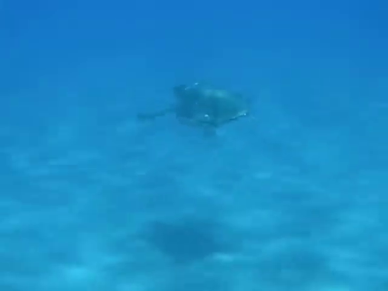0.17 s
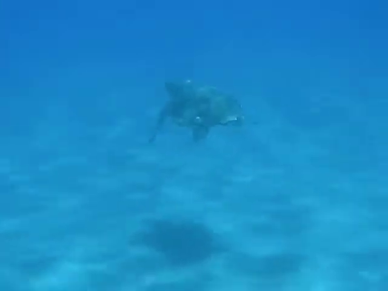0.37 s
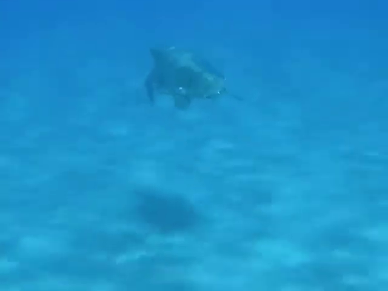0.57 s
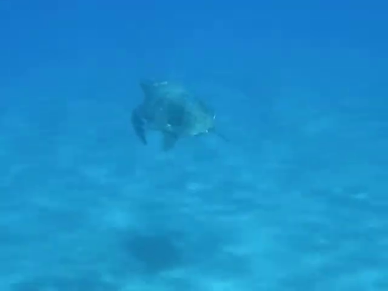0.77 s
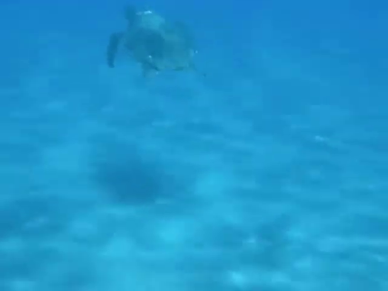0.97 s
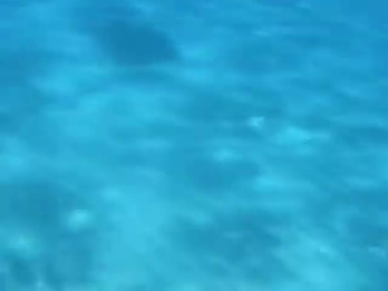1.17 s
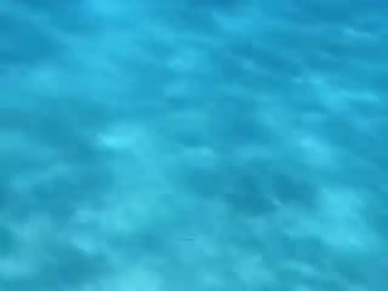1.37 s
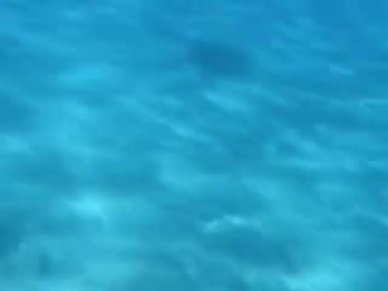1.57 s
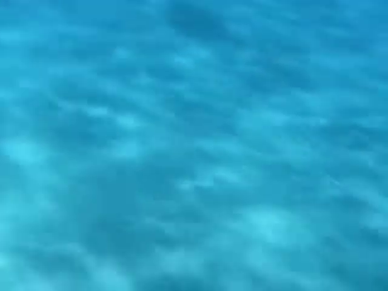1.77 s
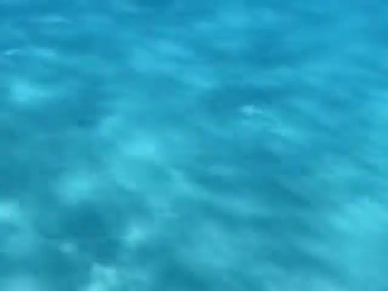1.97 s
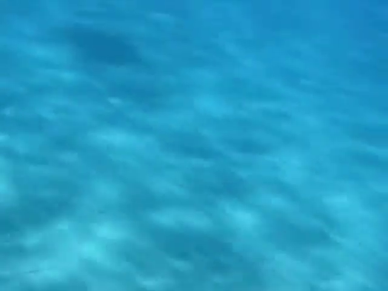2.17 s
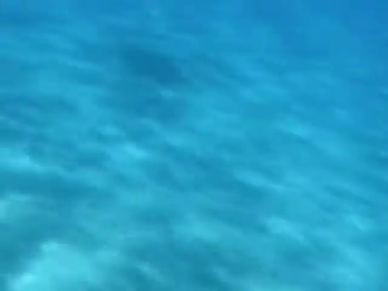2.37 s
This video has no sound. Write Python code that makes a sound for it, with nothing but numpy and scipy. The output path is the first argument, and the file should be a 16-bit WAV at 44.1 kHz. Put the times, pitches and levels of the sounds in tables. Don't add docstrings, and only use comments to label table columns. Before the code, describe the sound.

Water rushes and churns around a sealed camera in the sea, low, boxy and muffled, with the microphone inside the housing. Gulps cluster at 0.2-0.35 s, then small ticks and glugs around 0.65-0.9 s. After a calmer moment, bubbling returns near 1.3 s; hard, distorted gulps and a ringing knock hit at 1.6-1.75 s. Softer glugs follow before another loud surge around 2.2 s, then it eases.

```python
import sys
import numpy as np
from scipy import signal
from scipy.fft import rfft, irfft
from scipy.io import wavfile
from scipy.ndimage import uniform_filter1d

SR = 44100
rng = np.random.default_rng(int(sys.argv[2]) if len(sys.argv) > 2 else 0)


def wav_out(sig):
    wavfile.write(sys.argv[1], SR, np.round(np.clip(np.atleast_2d(sig).T, -1, 1) * 32767).astype(np.int16))


def field_ratio(decibels):
    return 10 ** (np.asarray(decibels, dtype=float) / 20)


N = 106589


def evened(x):
    return x / np.sqrt(np.mean(x ** 2) + 1e-20)


def read_spectrum(points, hz):
    f, level = np.transpose(points)
    return np.interp(np.log(hz + 1), np.log(f + 1), level)


def blip(length, hz, peak_at, glide, sharp):
    u = np.arange(0, 2 * length, 1 / SR) / length
    swell = (u / peak_at * np.exp(1 - u / peak_at)) ** sharp
    fade = np.cos(np.pi * u / 4) ** 2
    pitch = hz * (1 + glide * (u - peak_at))
    return swell * fade * np.sin(2 * np.pi * np.cumsum(pitch) / SR)


def add(mix, start, sound):
    part = mix[round(start * SR):][:len(sound)]
    part += sound[:len(part)]


def blips(rows, peak_at, glide, sharp):
    out = np.zeros(N)
    for start, length, hz, db in rows:
        add(out, start, field_ratio(db) * blip(length, hz, peak_at, glide, sharp))
    return out


# [t/s, flow pressure level/dB, bubble churn level/dB, camera sway level/dB]
FLOW = [(0, -26, -45, -34.5), (.17, -28.5, -38, -37), (.24, -22, -34.5, -27.5), (.3, -23, -42, -29.5),
        (.345, -23.5, -26, -35), (.39, -24.5, -44, -35.5), (.62, -24, -35.5, -36.5), (.78, -26.5, -26, -29),
        (0.849, -24.5, -26, -27.5), (.97, -22.5, -37, -34.5), (1.21, -23.5, -35, -31),
        (1.37, -22, -22, -28), (1.54, -21, -32, -26), (1.631, -13.5, -23.5, -20), (1.78, -16.5, -33.5, -21),
        (2.061, -21, -30.5, -34), (2.24, -11, -25, -34), (2.41, -21, -29.5, -32)]


def flow_db(t, column):
    rows = np.array(FLOW)
    return np.interp(t, rows[:, 0], rows[:, column] - np.median(rows[:, column]))


# [f/Hz, width/Hz, level/dB]
HOUSING_MODES = [(226, 55.3, 3.5), (300, 76, 1.5), (394.2, 72, -3), (519.5, 120, -13), (1210, 280, -14),
                 (1315, 66, -17.5), (1764, 420, -19.5), (1915, 160, -19.5), (2414, 140, -23),
                 (2725, 900, -29.5), (3091, 120, -24.5), (3602, 244, -27.5), (4170, 180, -49)]
# [f/Hz, level/dB]
BROAD_SHAKING = [(20, -4.5), (60, -8), (130, -7), (700, -29), (1500, -31.5), (2200, -46), (3300, -32.5),
                 (4400, -67)]


def housing_gain(hz):
    power = field_ratio(read_spectrum(BROAD_SHAKING, hz)) ** 2
    for f, width, db in HOUSING_MODES:
        power += field_ratio(db) ** 2 / (1 + (2 * (hz - f) / width) ** 2) ** 2
    return np.sqrt(power)


def rush():
    hop, size = 256, 1024
    frames, hz = N // hop + 5, np.fft.rfftfreq(size, 1 / SR)
    t = np.arange(frames) * hop / SR
    real, imag, patches = rng.standard_normal((frames, 513, 3)).T
    patches = uniform_filter1d(patches, size=8, axis=0)
    patches = evened(uniform_filter1d(patches, size=7, axis=1))
    flicker = evened(uniform_filter1d(rng.standard_normal(frames), size=3))

    split_hz, rumble_hz = 1500, 163
    hiss = (1 / (1 + (split_hz / (hz + 1)) ** 4))[:, None]
    rumble = (1 / (1 + (hz / rumble_hz) ** 6))[:, None]
    pressure, bubbling, sway = [flow_db(t, column) for column in (1, 2, 3)]
    level_db = (1 - hiss - rumble) * pressure
    level_db += rumble * 1.2 * sway
    level_db += hiss * (0.18 * bubbling - 0.096 * pressure)
    level_db += (1 - rumble) * (1 * patches - 1.9 * flicker)

    spectrum = (real + 1j * imag) * field_ratio(level_db)
    push = signal.istft(spectrum, nperseg=size, noverlap=size - hop)[1][:N]
    gain = housing_gain(np.fft.rfftfreq(N, 1 / SR))
    return field_ratio(-15.5) * evened(irfft(rfft(push) * gain, N))


# [f/Hz, level/dB]
BUBBLES = [(260, -10), (400, -1.5), (700, -1.5), (1100, -5.5), (1500, -10), (2000, -14)]


def churn():
    per_s, spread_db, cycles = 1600, 2, 6.74
    strength = field_ratio(spread_db * np.minimum(rng.exponential(1, N), 5))
    strength = strength * (rng.random(N) < per_s / SR)
    kind, out = rng.integers(0, 24, N), np.zeros(N)
    for k, hz in enumerate(np.geomspace(BUBBLES[0][0], BUBBLES[-1][0], num=24)):
        level = field_ratio(read_spectrum(BUBBLES, hz)) * np.sqrt(hz)
        grain = level * blip(cycles / hz, hz, peak_at=0.32, glide=0.088, sharp=1.7)
        out += signal.oaconvolve(strength * (kind == k), grain)[:N]
    return field_ratio(-28 + 1.3 * flow_db(np.arange(N) / SR, 2)) * evened(out)


# [t/s, length/s, f/Hz, peak level/dB]
TICKS = [(.159, .01, 1920, -20), (.236, .014, 510, -13), (.342, .01, 912, -18), (.624, .004, 1450, -20),
         (.694, .009, 1350, -19), (.748, .008, 950, -18), (.803, .006, 1150, -17), (.83, .008, 1040, -16),
         (.8395, .0035, 2450, -14), (.84, .0035, 1650, -14), (.879, .012, 360, -12),
         (.913, .008, 2470, -22), (.95, .015, 2380, -28), (1.272, .012, 1650, -20),
         (1.284, .014, 2420, -24), (1.33, .005, 1180, -13), (1.358, .006, 1900, -18),
         (1.378, .008, 1860, -18), (1.41, .008, 1960, -13), (1.4145, .008, 700, -8), (1.445, .01, 480, -11),
         (1.467, .008, 2400, -22), (1.645, .014, 480, -11), (1.79, .012, 850, -15), (1.79, .01, 470, -10),
         (1.848, .018, 800, -14), (2.253, .008, 700, -11), (2.262, .03, 550, -11), (2.276, .016, 300, -8)]


def ticks():
    return blips(TICKS, peak_at=0.26, glide=0.037, sharp=1.2)


# [t/s, f/Hz, peak level/dB, t60/s]
KNOCKS = [
    (1.716, 222, 6.5, .2),
    (1.3, 290, -10, 0.11),
]


def knocks():
    rise_s = 0.0019
    out, t = np.zeros(N), np.arange(0, .15, 1 / SR)
    for start, hz, db, t60 in KNOCKS:
        blow = 1 - np.exp(-t / rise_s)
        decay_db = 60 * t / t60 + 34 * (t / 0.29) ** 4
        add(out, start, blow * field_ratio(db - decay_db) * np.sin(2 * np.pi * hz * t))
    return out


# [t/s, length/s, f/Hz, peak level/dB]
GULPS = [(.204, 0.012, 179, -8), (.221, 0.0092, 227, -5.5), (.234, 0.013, 332, -12.5),
         (.251, 0.01, 210, -6.5), (.26, .05, 32.4, -18.5), (.315, 0.013, 336, -17),
         (.337, 0.0071, 462, -13), (.672, 0.11, 69.2, -18.5), (.703, 0.0053, 258, -9),
         (.765, 0.016, 368, -7), (.783, 0.011, 420, -17), (.818, .013, 376, -7), (1.329, 0.01, 232, -8),
         (1.381, 0.01, 290, -15), (1.4135, 0.015, 223, -9.5), (1.49, .026, 356.4, -11),
         (1.52, .045, 300, -15.5), (1.5865, .021, 237.7, 10), (1.695, 0.012, 399, -3),
         (1.7062, .012, 277, 9), (1.365, 0.013, 322, -10), (1.822, 0.025, 393, -5),
         (1.849, 0.028, 351, -4.5), (1.938, 0.018, 428, -5.5), (2.004, 0.04, 243, -10),
         (2.164, 0.023, 304.7, -9.5), (2.2058, .019, 416, 6), (2.225, .014, 300, -1.5),
         (2.25, 0.032, 403, -2), (2.375, 0.023, 227.4, -5.5)]


def gulps():
    return blips(GULPS, peak_at=0.32, glide=0.099, sharp=1.1)


def scene():
    water_limit = .85
    water = water_limit * np.tanh((rush() + churn()) / water_limit)
    return (water + gulps() + ticks() + knocks())[None]


def roll_off(x):
    return signal.sosfilt(signal.butter(12, 15830, fs=SR, output="sos"), x)


def record(dry):
    edge_hz, knee_db, squeeze, recover_db_per_s = 4380, -13, 0.52, 100
    band = signal.firwin(1023, edge_hz, window=("kaiser", 11), fs=SR)
    x = signal.oaconvolve(dry, band[None], "same")

    power = uniform_filter1d(x[0] ** 2, size=500, origin=249)
    power_db = 10 * np.log10(abs(power) + 1e-12)
    fall = np.arange(N) * recover_db_per_s / SR
    held_db = np.maximum.accumulate(power_db + fall) - fall
    over_db = np.maximum(held_db - knee_db, 0)
    x = x / field_ratio(squeeze * uniform_filter1d(over_db, size=500, origin=249))

    rail, middle, offset, hardness = .692, .0185, -.022, 40
    swing = (x + offset - middle) / rail
    mix = middle + rail * swing / (1 + abs(swing) ** hardness) ** (1 / hardness)
    return roll_off(mix)


dry = scene()
out = record(dry)
wav_out(out)
```